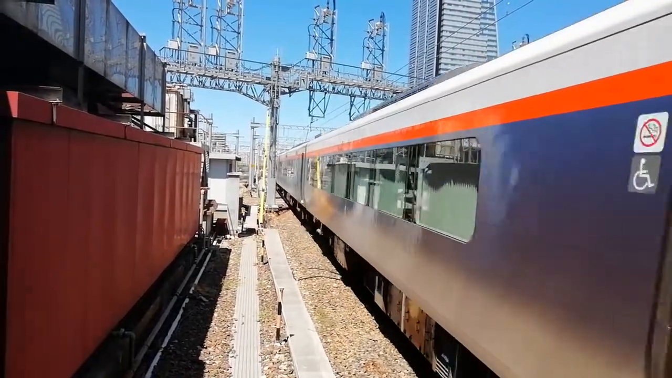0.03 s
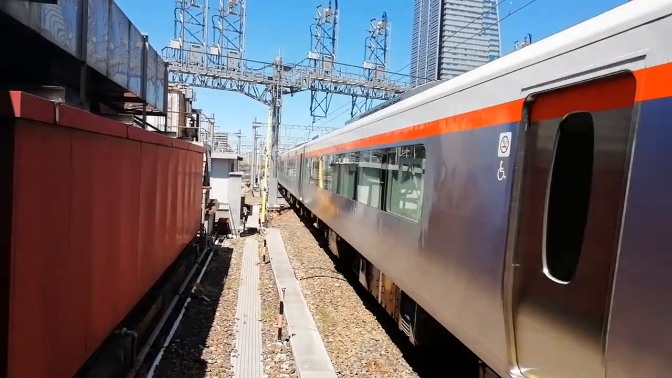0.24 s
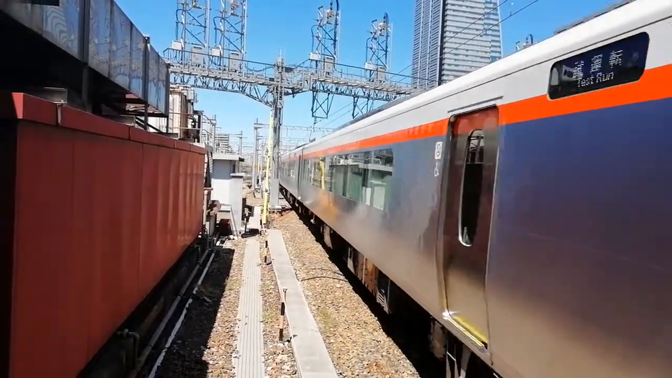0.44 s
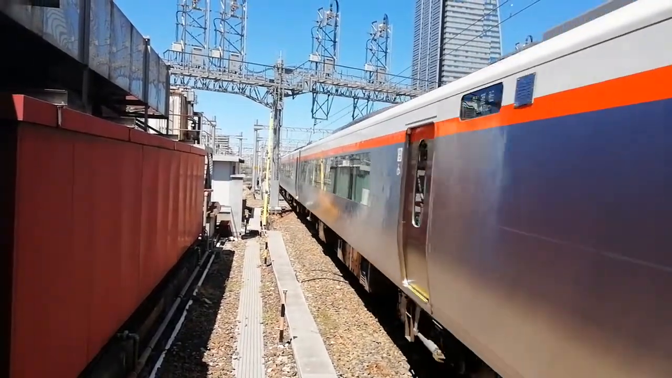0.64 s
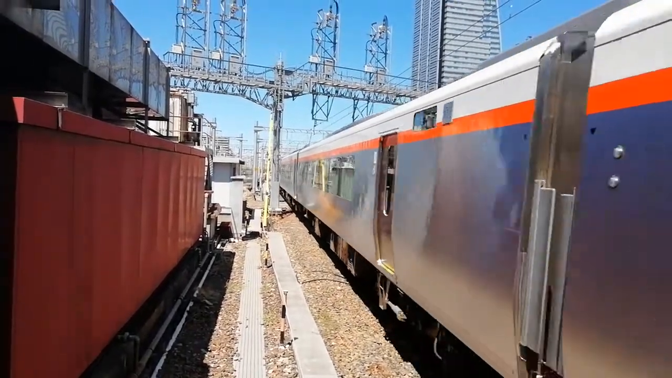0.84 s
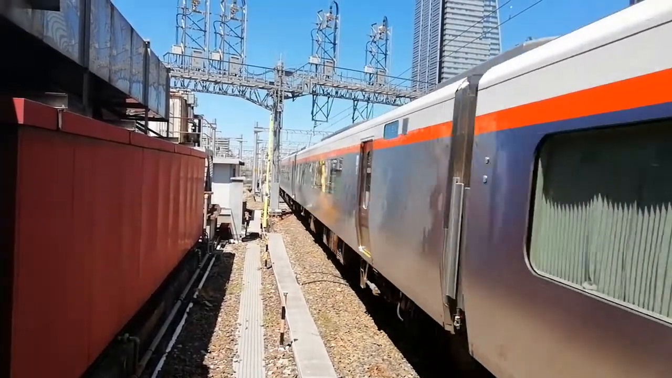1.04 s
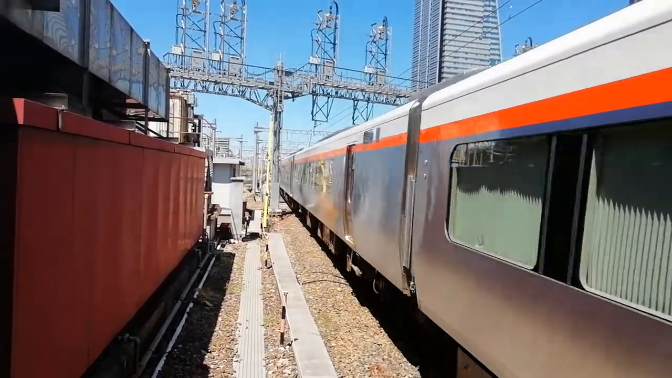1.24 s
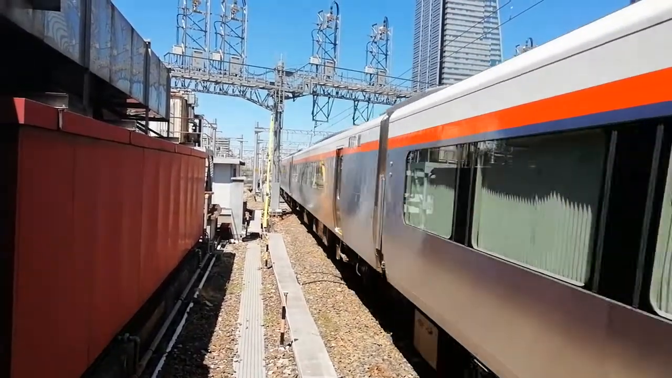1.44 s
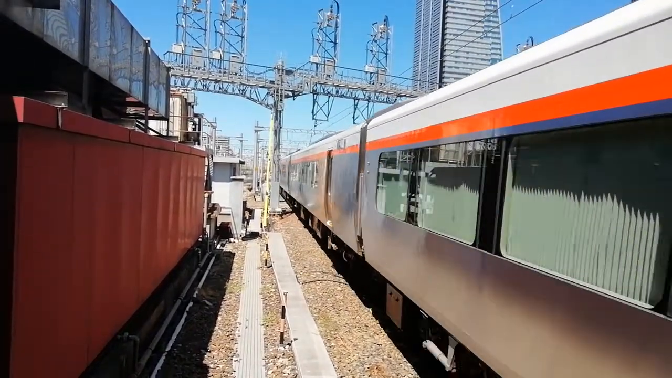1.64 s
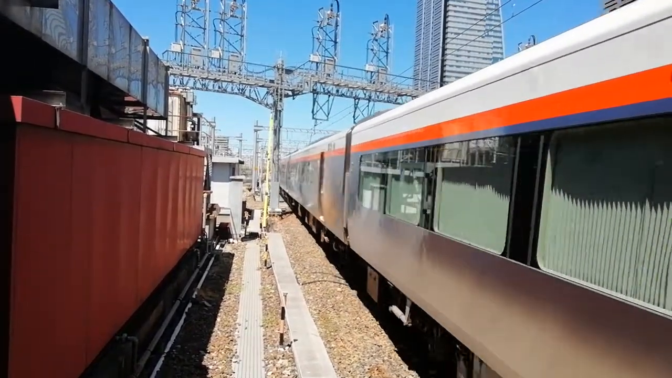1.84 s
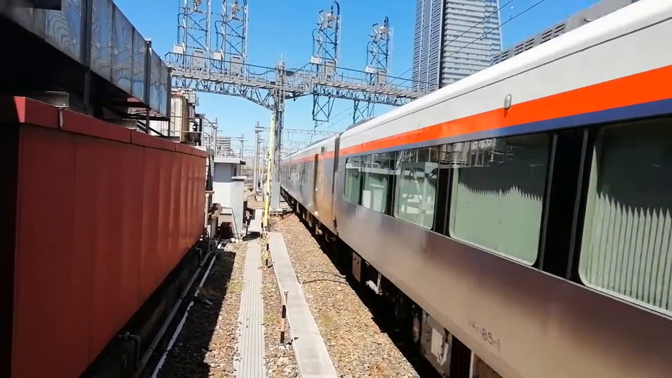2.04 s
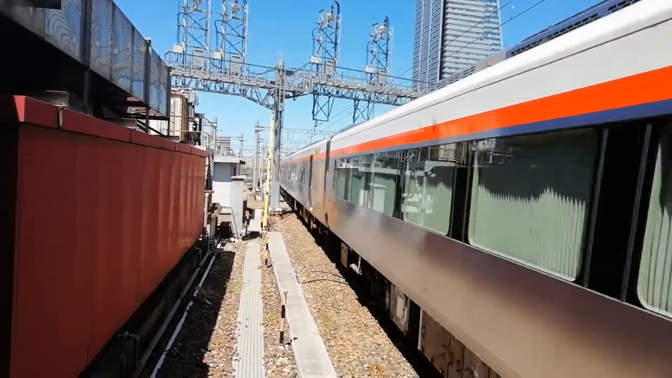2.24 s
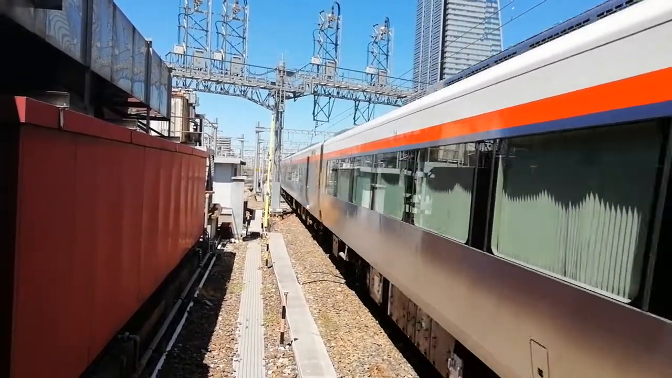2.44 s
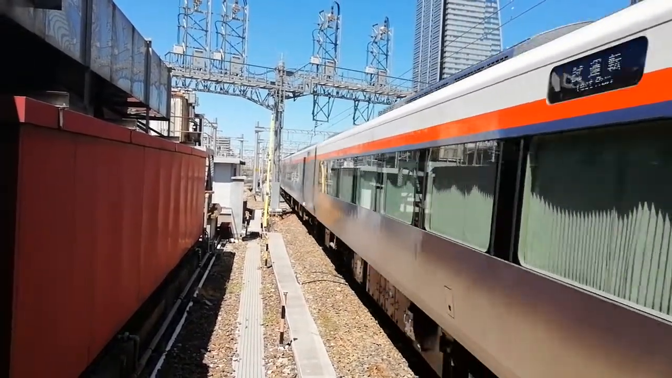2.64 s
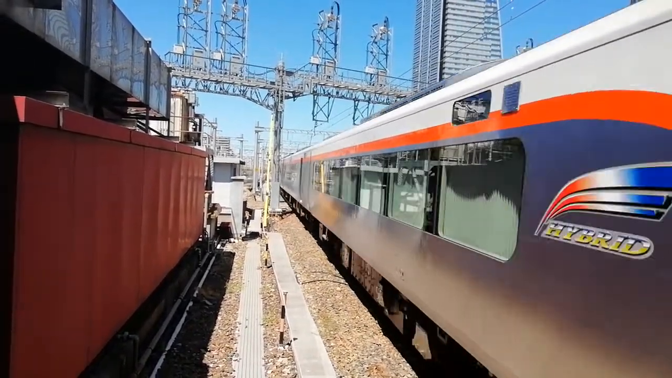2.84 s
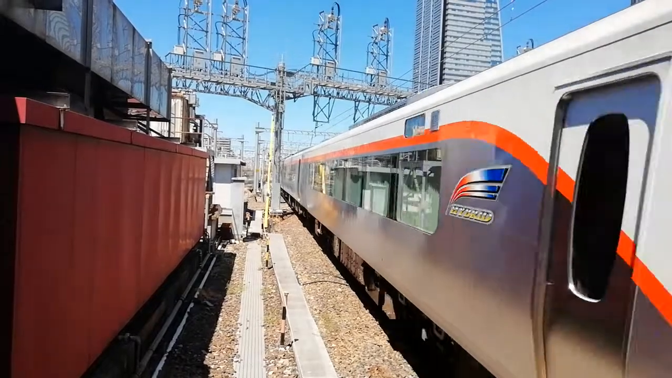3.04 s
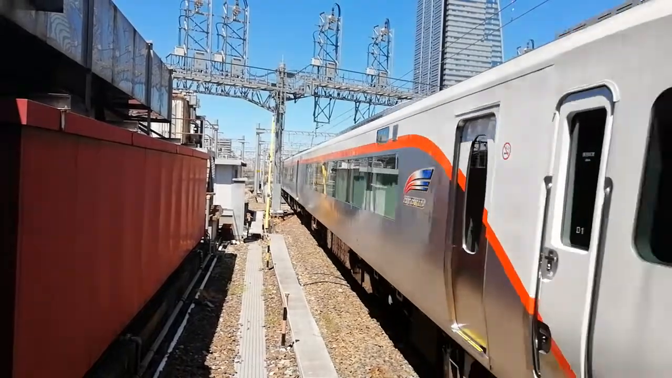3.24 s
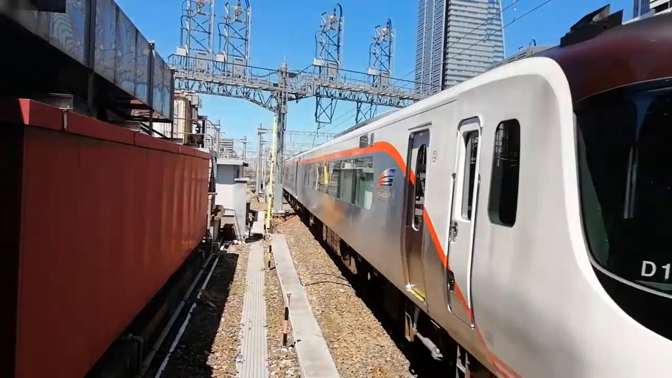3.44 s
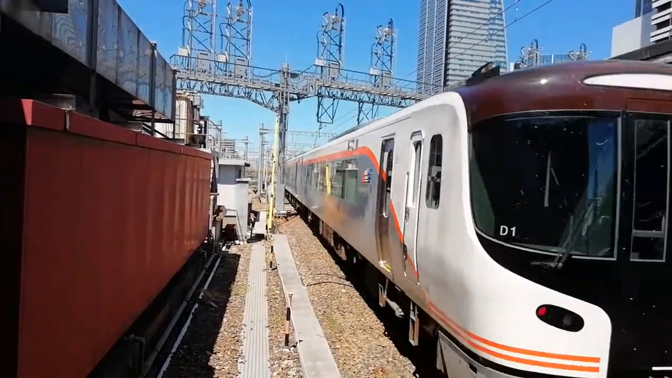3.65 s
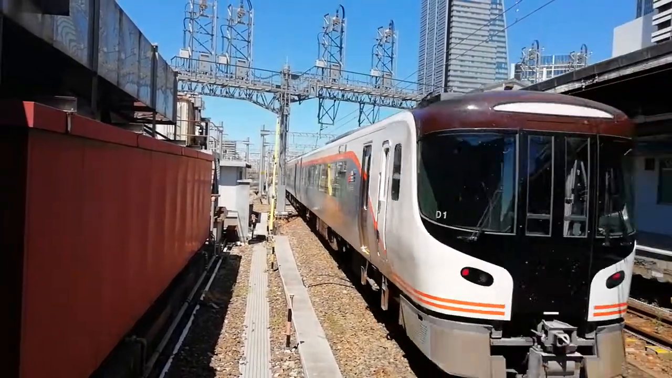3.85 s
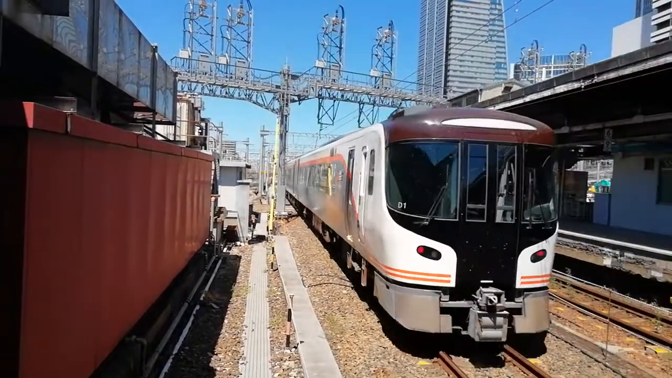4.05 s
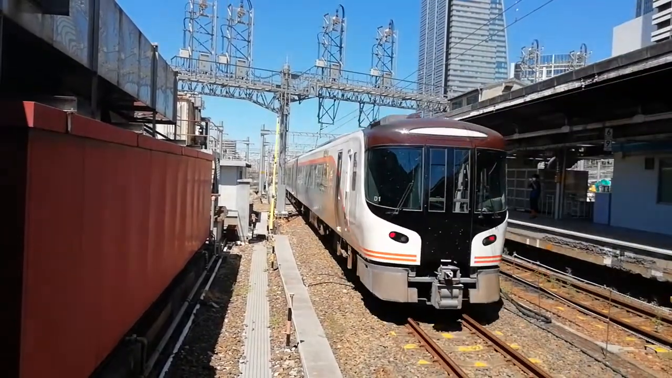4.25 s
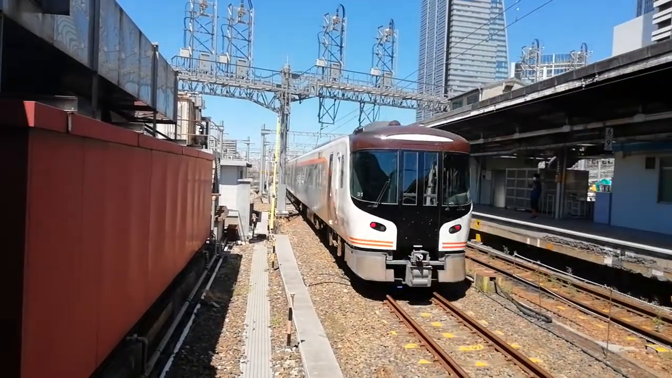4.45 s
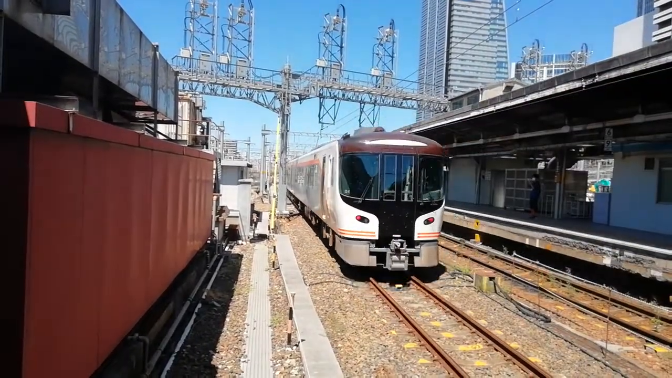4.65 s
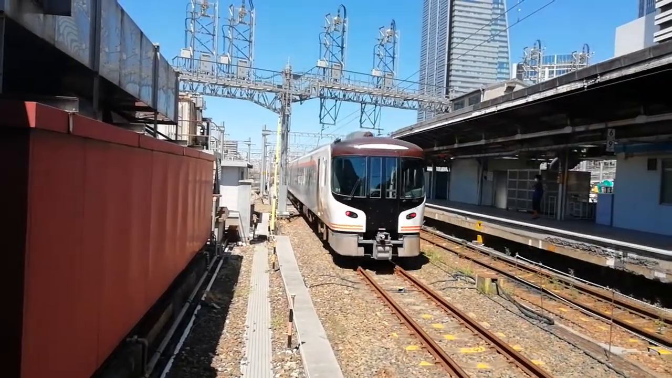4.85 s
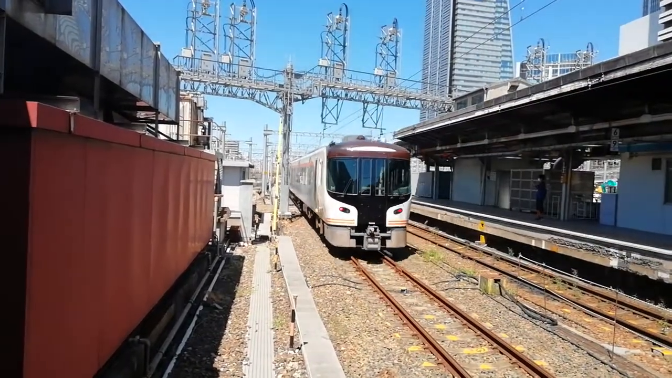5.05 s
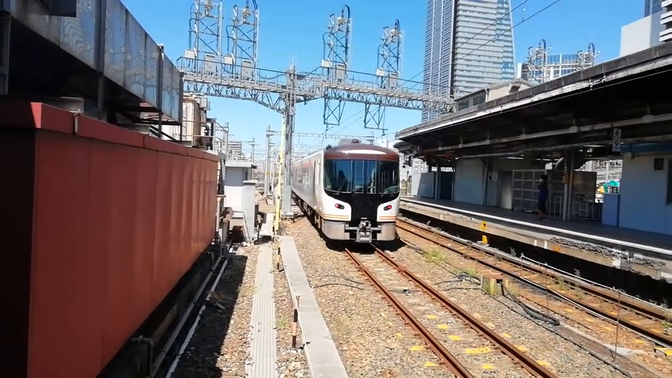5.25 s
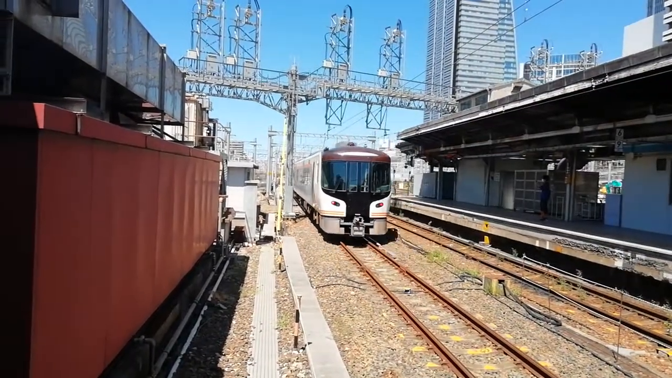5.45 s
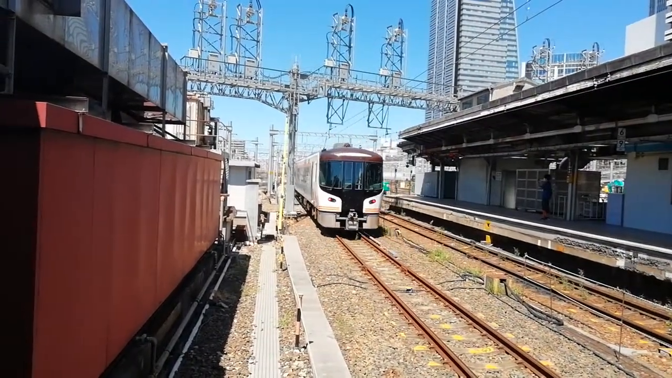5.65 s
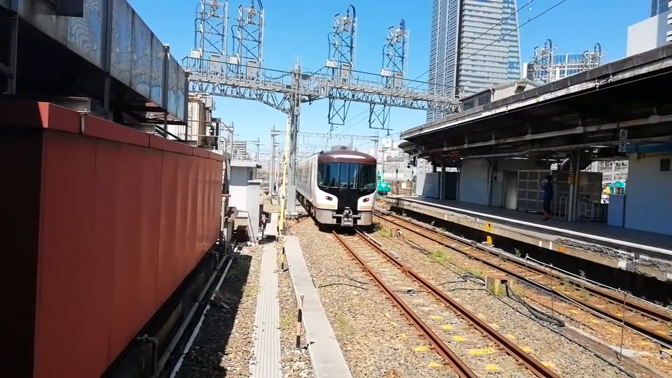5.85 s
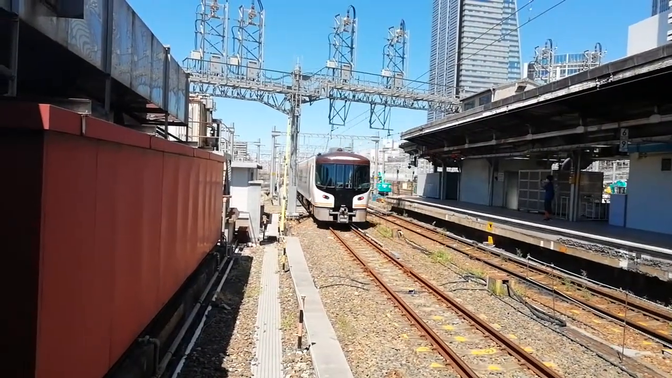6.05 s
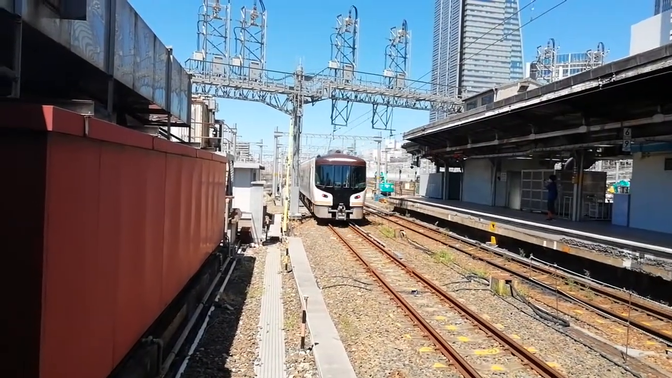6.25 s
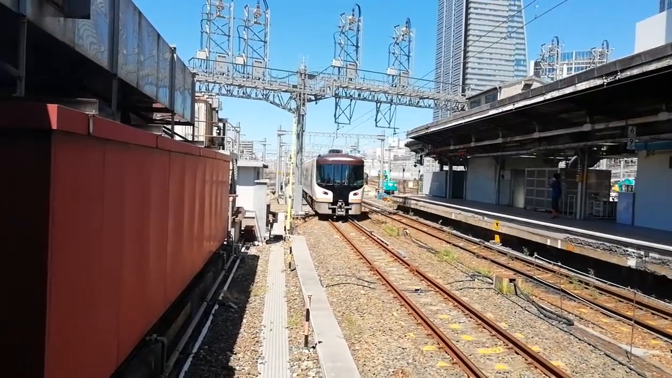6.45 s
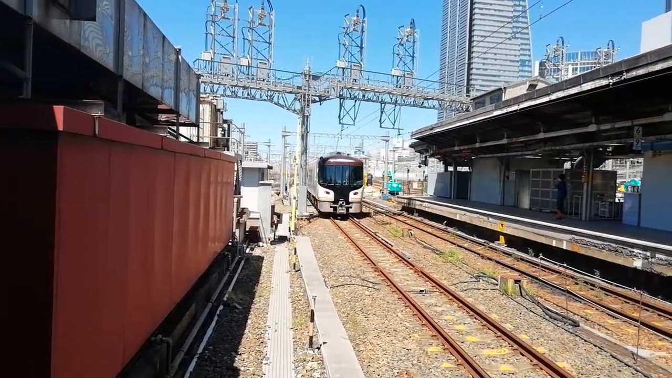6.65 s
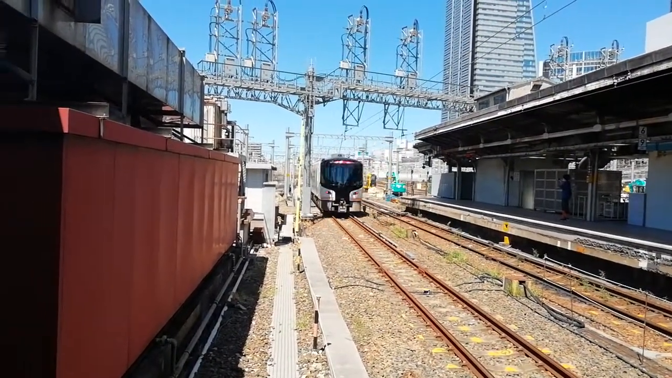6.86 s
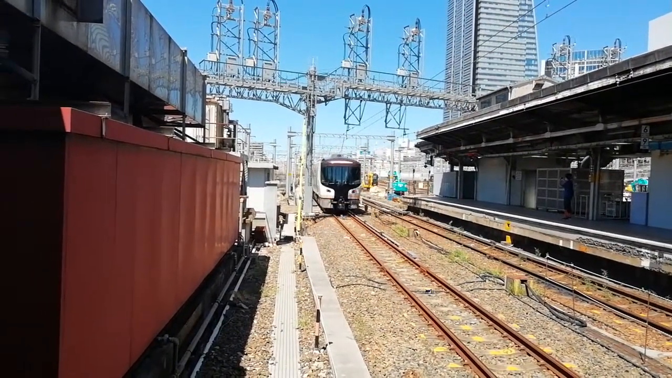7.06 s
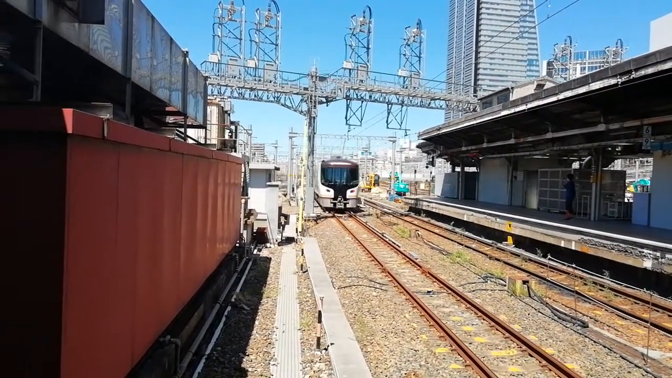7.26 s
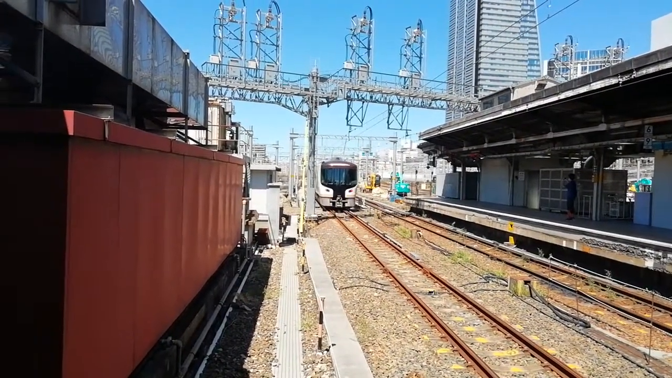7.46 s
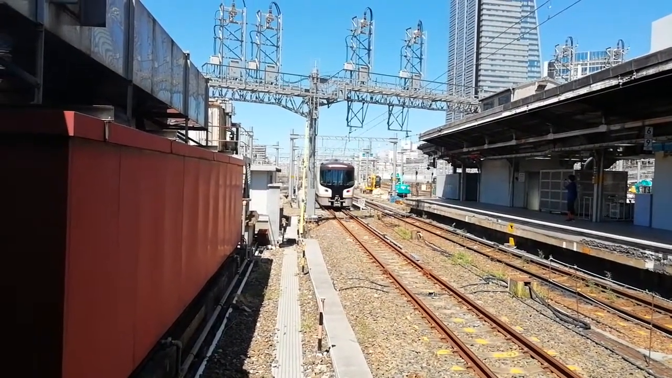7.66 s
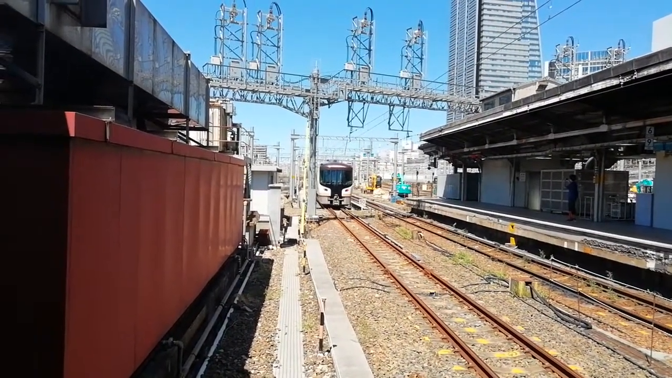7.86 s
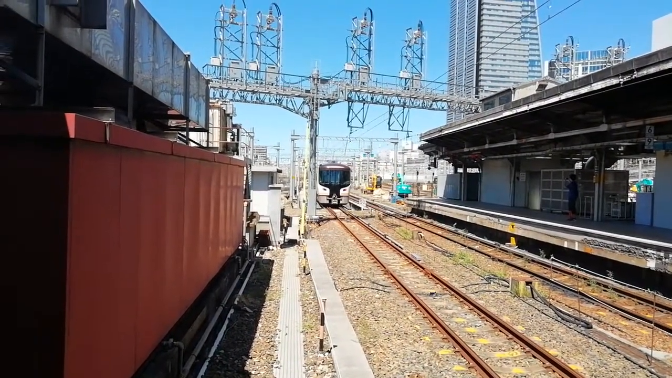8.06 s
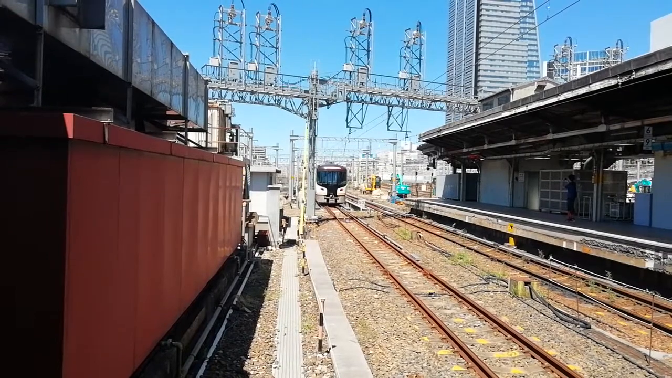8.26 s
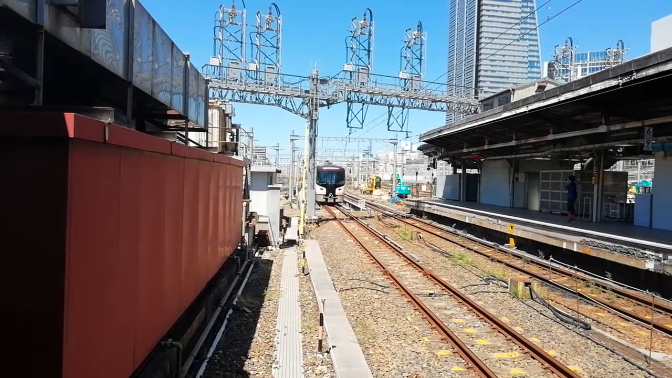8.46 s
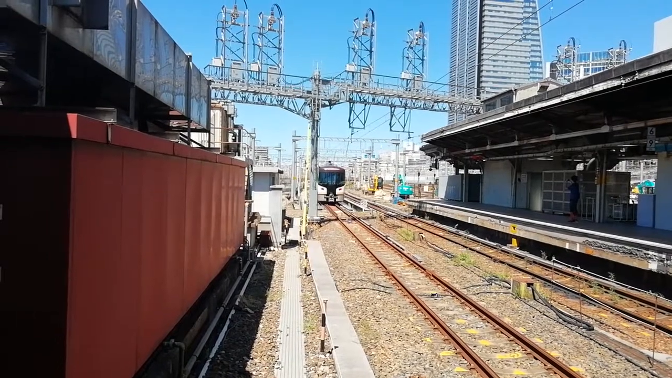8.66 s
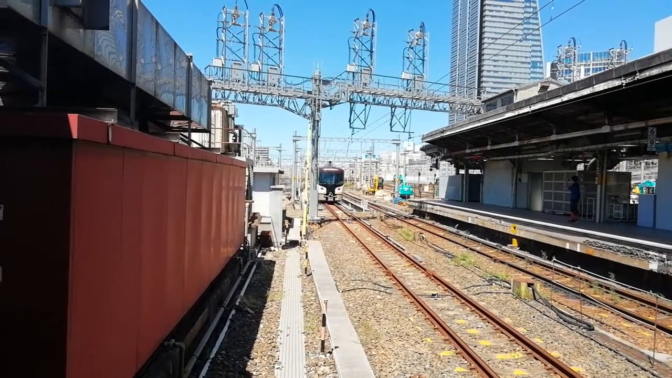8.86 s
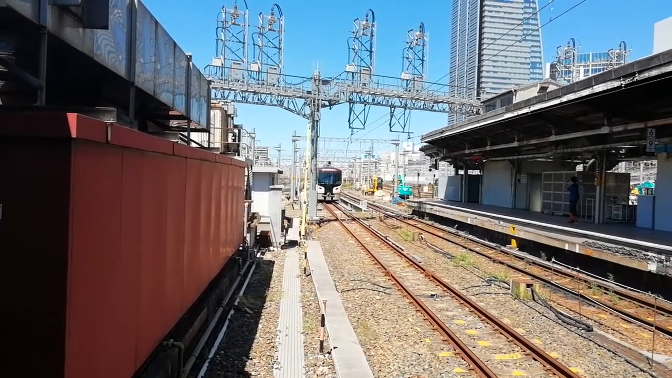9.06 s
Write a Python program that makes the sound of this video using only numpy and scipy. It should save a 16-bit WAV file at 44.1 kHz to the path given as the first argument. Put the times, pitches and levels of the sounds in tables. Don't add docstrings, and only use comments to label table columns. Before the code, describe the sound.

Outdoor stereo pickup from a fixed spot very near the rails. Car after car goes by with heavy diesel throb, metallic panel hum, rolling rumble and strong airy hiss from vents and grilles, with faint whistles inside it. The train then recedes, the hiss thinning first and the drone sinking unevenly, until soft clinks and a thin ringing rail appear far ahead, mostly to the right.

```python
import sys
import numpy as np
from scipy import signal
from scipy.fft import rfft, irfft, next_fast_len
from scipy.io import wavfile

SR = 44100
rng = np.random.default_rng(int(sys.argv[2]) if len(sys.argv) > 2 else 0)


def boost_factor(decibels):
    exponent = np.asarray(decibels, float) / 20
    return 10 ** exponent


def transcribe(u):
    v = np.clip(np.atleast_2d(u).T, -1, 1)
    q = np.round(v * 32767).astype(np.int16)
    wavfile.write(sys.argv[1], SR, q)


N = 401751
SIZE = next_fast_len(N)

# (time [s], firing rate [Hz], firing tone level [dB], its octave's level [dB])
EXHAUST = [(0.0, 82.3, -28, -34), (0.33, 81.76, -23, -30), (0.46, 81.37, -25, -41),
           (1.6, 80.84, -18.5, -26.5), (1.62, 81.2, -19.5, -34.5), (1.83, 80.7, -21, -21.5),
           (2.36, 81.4, -29.5, -32.5), (2.69, 81.77, -21.5, -18.5), (3.4, 80.3, -17, -23.5),
           (4.01, 79.7, -27.5, -36), (4.23, 81.25, -42.5, -40.5), (4.64, 78.4, -32.5, -48),
           (5.43, 78.74, -41, -61), (6.06, 78.85, -34.5, -35), (6.95, 78.6, -40, -51.5),
           (7.38, 79.15, -36.5, -42.5), (7.74, 78.66, -46, -50.5), (9.11, 81.8, -40.5, -51)]
# (time [s], half length [s], firing tone change [dB], octave change [dB])
BEATS = [(0.104, 0.029, 1.5, 6), (0.533, 0.057, 2.5, -14), (0.646, 0.04, 2.5, -2), (0.8, 0.055, 0.5, 5),
         (0.968, 0.055, 0.5, -3), (1.06, 0.038, -4, 2.5), (1.406, 0.069, -2, 5), (2.135, 0.029, 1.5, -4.5),
         (2.6, 0.058, -5.5, -1), (2.897, 0.058, -2, 1), (3.664, 0.073, 0, -5.5), (4.35, 0.034, 0, 7),
         (4.459, 0.025, 7.5, 11), (4.558, 0.034, -2, 3), (4.72, 0.054, 7.5, 4), (4.969, 0.11, -4.5, 8.5),
         (5.25, 0.04, 4, -1), (5.5, 0.041, 4, 12), (5.699, 0.1, 0.5, 2), (6.72, 0.065, 4, 5),
         (7.5, 0.04, -1, -0.5), (8.0, 0.064, -15, -1), (8.297, 0.15, 0, -1)]
# (multiple of the full engine cycle [1], front engine level [dB], tail engine level [dB])
LOW_ORDERS = [(4, -32, -31), (5, -38, -41), (7, -27, -29), (8, -14, -12.5), (9, -15.5, -14),
              (10, -19.5, -15.5), (11, -29, -25), (13, -18.5, -13), (14, -24.5, -22), (15, -21, -22),
              (16, -22, -25), (17, -26, -20), (18, -27.5, -16.5), (19, -36, -27), (20, -29.5, -22),
              (21, -30, -24), (22, -26, -21), (23, -39, -36), (24, -45, -51), (25, -30, -23)]
HIGH_ORDERS = [(26, -39, -30), (27, -28, -30), (28, -32, -36), (29, -30, -28.5), (30, -25, -22.5),
               (31, -22, -41), (32, -26.5, -27.5), (33, -20.5, -20.5), (34, -31, -45), (35, -35, -30),
               (36, -23, -27), (37, -26, -23), (38, -45, -42)]
# (time [s], half length [s], swell [dB])
EXHAUST_PASSES = [
    (0.15, 0.1, 3.0),
    (1.45, 0.59, 11.7),
    (2.75, 0.29, 6.9),
    (3.2, 0.38, 7.6),
    (4.75, 0.15, 1.7),
    (7.42, 0.05, 3),
    (8.35, 0.08, 3.0),
    (3.95, 0.12, 1.8),
]
# (pitch [Hz], level against the body hum [dB])
HUMS = [(194, -2.5), (285, -20)]
# (time [s], half length [s], swell [dB])
PANEL_PASSES = [(0.12, 0.12, -8), (0.5, 0.13, 10.5), (0.82, 0.035, 18.5), (1.05, 0.068, 14),
                (1.2, 0.054, 11), (1.39, 0.075, 5), (1.7, 0.098, 15), (2.15, 0.06, 6), (2.72, 0.08, 12),
                (3.3, 0.18, 13), (4.75, 0.093, 3), (4.95, 0.11, 7.5), (6.25, 0.12, 4.5), (6.6, 0.11, 8),
                (6.95, 0.12, 7), (7.55, 0.063, 9.0), (8.35, 0.049, 17), (8.62, 0.1, 8.5),
                (8.75, 0.061, 7.5), (8.97, 0.1, 10.5)]
TAIL_ENGINE_S, ORDERS_FADE_DB = 2.6, -5.5


def engine(high_db):
    firing_hz, tone_db, octave_db = in_time(EXHAUST)
    s, half_s, tone_beat_db, octave_beat_db = np.transpose(BEATS)
    tone_db = tone_db + per_sample(swells(s, half_s, tone_beat_db))
    octave_db = octave_db + per_sample(swells(s, half_s, octave_beat_db))
    low_db = level_of(EXHAUST_PASSES, near_db=-40.5, by_distance=1, by_pass=1.096, wander_db=1.3)
    hum_db = level_of(PANEL_PASSES, near_db=-47, by_distance=0.5, by_pass=1.0861, wander_db=-2)

    cycle = 2 * np.pi * np.cumsum(firing_hz) / SR / 6
    firing = boost_factor(tone_db) * np.sin(6 * cycle)
    octave = boost_factor(octave_db) * np.sin(12 * cycle + 1.1)
    out = np.sqrt(2) * (firing + octave)

    coarse = cycle[::10]
    size = len(coarse)
    uneven, far = np.zeros(size), farness()[::10]
    tail = np.clip((np.arange(0, N, 10) / SR - TAIL_ENGINE_S) / 0.31 + .5, 0, 1)
    for orders, level_db in ((LOW_ORDERS, low_db[::10] + 8.5), (HIGH_ORDERS, high_db[::10] + 19.5)):
        for order, front_db, tail_db in orders:
            db = level_db + front_db + (tail_db - front_db) * tail + ORDERS_FADE_DB * far
            db = db + (1.5 + 3.1 * far) * drift(1.0, size=size)
            wander = (0.15 + 0.8 * far) * drift(3.0, size=size) + rng.uniform(0, 2 * np.pi)
            uneven += boost_factor(db) * np.sin(order * coarse + wander)
    out += signal.resample_poly(uneven, 10, 1)[:N]
    for hz, db in HUMS:
        out += boost_factor(hum_db + db) * wavering(hz, wobble_hz=3.53, flutter_db=2.5)
    return out


# (time of the cut [s], build-up time [s], level [dB])
ECHO_CUTS = [
    (4.83, 0.07, 6.5),
    (7.45, 0.076, 4.5),
]


def echo_cuts():
    t = np.arange(N) / SR
    out = np.zeros(N)
    for s, build_s, db in ECHO_CUTS:
        growth = np.exp(np.minimum(t - s, 0) / build_s)
        out += db * growth * np.clip((s - t) / .006, 0, 1)
    return out


# (time [s], pitch [Hz], half length [s], peak level [dB])
CASING_RINGS = [(0.117, 412, 0.06, -42), (0.15, 245, 0.05, -41), (0.168, 285, 0.1, -41),
                (0.36, 410, 0.06, -40), (0.65, 285, 0.05, -44), (0.97, 480, 0.1, -46),
                (1.03, 288, 0.07, -42), (1.17, 412, 0.1, -36), (1.34, 420, 0.1, -47),
                (1.379, 480, 0.08, -42), (1.39, 194.4, 0.079, -30), (1.88, 293, 0.15, -43),
                (1.85, 415, 0.05, -48), (1.93, 445, 0.091, -37), (1.95, 474, 0.2, -41),
                (2.0, 600, 0.15, -49), (2.17, 481, 0.09, -38), (2.363, 421, 0.16, -32.5),
                (2.45, 245.5, 0.05, -37), (2.45, 442, 0.055, -37), (2.554, 505, 0.06, -39),
                (2.65, 483, 0.054, -39), (2.801, 420, 0.093, -38.5), (2.8, 505, 0.078, -37),
                (3.08, 490, 0.06, -37), (3.25, 475, 0.11, -45), (3.27, 440, 0.096, -33.5),
                (3.3, 404, 0.08, -42), (3.78, 481, 0.089, -42), (3.8, 243, 0.2, -48.5),
                (3.93, 284, 0.05, -44.5), (4.0, 454, 0.07, -39), (4.15, 283, 0.1, -41.5),
                (4.5, 430, 0.05, -48), (4.55, 478, 0.04, -37.5), (4.7, 410, 0.048, -47),
                (5.6, 421, 0.31, -57), (8.6, 404, 0.35, -55)]
RING_WOBBLE_HZ, RING_FLUTTER_DB = 7.0, 1.5


def casing_rings():
    t = np.arange(0, N, 10) / SR
    out = np.zeros(len(t))
    for s, hz, half_s, db in CASING_RINGS:
        turn = 2 * np.pi * np.cumsum(hz + RING_WOBBLE_HZ * drift(7.9, size=len(t))) * 10 / SR
        level = boost_factor(db + RING_FLUTTER_DB * drift(9.5, size=len(t)))
        out += level * np.exp(-.5 * ((t - s) / half_s) ** 2) * np.sin(turn)
    return np.sqrt(2) * signal.resample_poly(out, 10, 1)[:N]


# (time [s], half length [s], swell [dB])
ENGINE_PASSES = [
    (0.2, 0.2, 1.5),
    (1.14, 0.13, 4),
    (1.802, 0.32, 2.5),
    (2.404, 0.23, 10.5),
    (2.836, 0.07, 4.5),
    (3.262, 0.13, 8),
    (3.949, 0.15, 2.5),
    (4.6, 0.14, 0),
]


def casing_level():
    return level_of(ENGINE_PASSES, near_db=-42, by_distance=0.84, by_pass=0.96, wander_db=0)


# (time [s], half length [s], swell [dB])
AXLE_PASSES = [(0.75, 0.18, 2), (1.8, 0.28, 5.5), (2.5, 0.2, 3), (2.95, 0.12, 3.5), (4.0, 0.19, -3.5),
               (5.1, 0.18, -1), (5.5, 0.17, -0.5), (6.3, 0.1, -4.5), (7.4, 0.1, 2), (8.05, 0.1, 2.5),
               (8.3, 0.12, 2), (8.6, 0.1, 1.5), (9.0, 0.15, 1)]
# (time [s], half length [s], swell [dB])
MOTOR_PASSES = [
    (0.798, 0.083, 2.7),
    (1.35, 0.14, 7.1),
    (1.85, 0.22, 9.3),
    (2.3, 0.26, 12),
    (2.6, 0.058, 5.7),
    (3.0, 0.19, 5.3),
    (4.6, 0.15, 2.2),
    (8.2, 0.58, 2.52),
]
# (time [s], half length [s], swell [dB])
BOGIE_PASSES = [
    (0.7, 0.08, 0),
    (1.4, 0.76, 1),
    (2.1, 0.3, 0.5),
    (2.45, 0.08, 0.5),
    (3.45, 0.47, -1.5),
    (4.6, 0.51, 1),
    (8.2, 0.36, 1),
]


def running_gear(fields, casing_db):
    rumble_db = level_of(AXLE_PASSES, near_db=-40.5, by_distance=0.6, by_pass=1.06, wander_db=1)
    drone_db = level_of(MOTOR_PASSES, near_db=-53, by_distance=0.3, by_pass=1.06, wander_db=0.5)
    roll_db = level_of(BOGIE_PASSES, near_db=-43.5, by_distance=0.47, by_pass=0.57, wander_db=0.8)
    hiss_db = level_of(BOGIE_PASSES, near_db=-43.5, by_distance=0.58, by_pass=1.07, wander_db=0.4)
    ahead, far = aheadness(), farness()
    gear = boost_factor(rumble_db + 3.0 + 1.3 * far) * band_of(fields, 66, 335, ahead)
    gear += boost_factor(casing_db - 4.5 + 3.6 * far) * band_of(fields, 335, 510, ahead)
    gear += boost_factor(drone_db - 3.0) * band_of(fields, 510, 660, ahead)
    gear += boost_factor(roll_db) * band_of(fields, 660, 1230, ahead)
    gear += boost_factor(hiss_db + 2.0) * band_of(fields, 1230, 2330, ahead)
    return gear


# (time [s], half length [s], swell [dB])
FAN_PASSES = [
    (0.4, 0.4, 0.56),
    (2.55, 0.18, 1.4),
    (3.45, 0.42, -2.1),
    (4.3, 0.96, 0.84),
    (7.55, 0.1, -0.3),
]


def rush_level():
    return level_of(FAN_PASSES, near_db=-35, by_distance=0.91, by_pass=1.23, wander_db=0.2)


# (time [s], half length [s], swell [dB])
VENT_PASSES = [
    (0.0, 0.16, 4.5),
    (0.6, 0.46, 6.5),
    (0.76, 0.05, 0.5),
    (2.64, 0.092, 2),
    (2.8, 0.48, 0),
    (3.5, 0.25, -2.5),
    (4.2, 0.2, 1),
]
# (time [s], half length [s], swell [dB])
LOUVRE_PASSES = [
    (0.0, 0.1, 1.5),
    (0.4, 0.58, 4.5),
    (1.8, 0.15, 0),
    (2.62, 0.088, 2.5),
    (2.8, 0.44, 3.5),
    (4.0, 0.3, 1.5),
]
# (time [s], left-right difference [dB])
TOP_PAN = [(0, 7), (0.9, 5), (1.5, -2.5), (2.2, -2.5), (2.7, 1), (4.5, 4), (9.11, -5)]
AIR_PAN_DB, PAN_PER_VENT_DB, RUSH_GUST_DB = -0.5, 0.2, 0.4


def cooling_air(fields, rush_db):
    jet_db = level_of(VENT_PASSES, near_db=-32, by_distance=1.266, by_pass=1.1, wander_db=0.5)
    top_db = level_of(LOUVRE_PASSES, near_db=-52, by_distance=1.2, by_pass=2, wander_db=0.5)
    gust, far = drift(24), farness()
    jet_db = jet_db + 0.13 * gust + 0.58 * drift(64) + 0.24 * drift(26)
    air = boost_factor(rush_db + RUSH_GUST_DB * gust) * band_of(fields, 2330, 5650, far)
    air += boost_factor(jet_db) * band_of(fields, 5650, 12250, far)
    pan_db = AIR_PAN_DB + PAN_PER_VENT_DB * per_sample(swells(*np.transpose(VENT_PASSES)))
    air *= boost_factor(np.array([pan_db, -pan_db]) / 2)
    top_pan_db = np.array([[.5], [-.5]]) * in_time(TOP_PAN)[0]
    air += boost_factor(top_db + .2 * gust + top_pan_db) * band_of(fields, 12250, 17000, far)
    return air


# (pitch [Hz], width [Hz], level re rush alongside [dB], level re rush far off [dB], left-right difference [dB])
WHISTLES = [(4100, 20, -31, -27, -5), (1033, 60, -16, -13.5, -1), (1385, 22, -23, -15, -11),
            (594.6, 22, -17.5, -21, 1)]
# (time [s], converter whine [Hz], wheel ring [Hz], wheel ring level [dB])
RINGS = [(0, 2333, 1400, -56), (1.1, 2440, 1437, -63), (1.75, 2418, 1687, -46), (2.0, 2420, 1527, -40),
         (2.15, 2433, 1560, -49), (2.38, 2426, 1630, -40), (2.6, 2410, 1400, -46),
         (2.95, 2400, 1335, -45.5), (3.3, 2400, 1356, -52), (4.2, 2347, 1416, -50), (6, 2380, 1400, -58.5),
         (9.11, 2390, 1385, -53.5)]
# (time [s], half length [s], swell [dB])
CONVERTER_PASSES = [(0.7, 0.27, 2.7), (1.84, 0.055, 8.7), (2.0, 0.087, 5.0), (2.17, 0.057, 7.3),
                    (2.28, 0.05, 5), (2.4, 0.081, 7.3), (2.65, 0.09, 3.6), (3.05, 0.06, 2.8),
                    (3.9, 0.19, 1.8), (5.05, 0.31, 5.6), (6.2, 0.2, 3.0), (8.4, 0.15, 7.1)]
# (time [s], centre [Hz])
GRILLE_HZ = [(0, 3800), (1, 3855), (2.2, 3674), (2.8, 3542), (5, 3588), (9.11, 3585)]
# (time [s], half length [s], swell [dB])
GRILLE_PASSES = [
    (0.4, 0.3, 8.2),
    (1.3, 0.2, 3),
    (2.35, 0.1, 2.3),
    (2.7, 0.17, 6.7),
    (4.3, 0.79, 4),
    (5.8, 0.5, 3),
]
WHINE_WIDTH_HZ, WHEEL_WIDTH_HZ, GRILLE_WIDTH_HZ = 65, 260, 440


def whistles(rush_db):
    far = farness()
    whine_hz, wheel_hz, wheel_db = in_time(RINGS)
    whine_db = level_of(CONVERTER_PASSES, near_db=-47.5, by_distance=0.75, by_pass=1.0, wander_db=1.5)
    grille_db = level_of(GRILLE_PASSES, near_db=-51, by_distance=1, by_pass=1.0, wander_db=-0.5)
    tones = []
    for hz, width_hz, near_db, far_db, pan_db in WHISTLES:
        level_db = rush_db + near_db + (far_db - near_db) * far + 1.9 * drift(0.91)
        tones.append((hz, width_hz, level_db, pan_db))
    tones.append((whine_hz, WHINE_WIDTH_HZ, whine_db + 0.5 - 7.7 * far, -4.5))
    tones.append((wheel_hz, WHEEL_WIDTH_HZ, wheel_db, -6))
    tones.append((in_time(GRILLE_HZ)[0], GRILLE_WIDTH_HZ, grille_db, -10))
    out = np.zeros((2, N))
    for hz, width_hz, level_db, pan_db in tones:
        shared, own = narrow_noise(hz, width_hz, channels=2)
        left = boost_factor(pan_db / 2) * shared
        right = boost_factor(-pan_db / 2) * (1.4 * own - .5 * shared)
        out += boost_factor(level_db) * np.array([left, right])
    return out


# (time [s], level [dB])
RAIL_SONG = [(5.9, -75), (6.45, -57), (6.75, -58), (7.1, -68), (7.57, -67), (7.66, -54), (7.9, -55),
             (8.0, -57), (8.1, -52), (8.2, -54), (8.27, -61), (8.37, -50), (8.43, -57), (8.56, -57),
             (8.66, -67)]
# (time [s], peak level [dB], pitch [Hz])
CLINKS = [
    (7.631, -34.5, 3850),
    (7.645, -44, 2300),
    (7.845, -46, 4000),
    (8.09, -44, 3100),
    (8.235, -45, 4100),
    (8.335, -44, 2900),
    (9.094, -43, 3450),
]
RAIL_HZ = 3222


def rails():
    song_db, = in_time(RAIL_SONG)
    out = boost_factor(song_db) * wavering(RAIL_HZ, wobble_hz=1.0, flutter_db=.8)
    age = np.arange(SR // 5) / SR
    for s, db, hz in CLINKS:
        noise = rng.standard_normal(len(age))
        ring = rms_one(resonate(resonate(noise, hz, 1800), hz, 1800))
        burst = ring * (1 - np.exp(-age / .009)) * np.exp(-age / .03)
        start = round(s * SR)
        out[start:start + len(age)] += boost_factor(db) * burst[:N - start]
    return out * boost_factor(np.array([[-9.], [5.5]]))


# (time [s], half length [s], swell [dB])
GROUND_THUDS = [
    (2.2, 0.3, -6),
    (2.8, 0.2, 4),
    (3.8, 0.18, 6),
    (4.74, 0.11, 8),
    (6.1, 0.3, 0),
    (7.4, 0.3, 8),
    (8.2, 0.4, 0),
]


def ground(fields):
    level_db = level_of(GROUND_THUDS, near_db=-46, by_distance=0.5, by_pass=0.5, wander_db=-0.2)
    return boost_factor(level_db) * band_of(fields, 21, 66, aheadness())


# (frequency [Hz], left level [dB], right level [dB])
COLOUR_NEAR = [(25, -6, -6), (45, -3, -5), (64.5, 5, 4), (141, 10, -0.5), (220, 3, 1), (283, 2, 3.5),
               (363, -7, -2), (433, 11.5, 13.5), (498, 7.5, 10), (576, -4, 3.5), (673, -3.5, -0.5),
               (742, -1.5, 1.5), (1110, -3.5, -6.5), (1400, -8, -7), (1900, -7, -5),
               (2360, -12, -9), (2620, -9, -7), (2700, -10.5, -4), (3940, -10.5, -6), (5720, -15.5, -7.5),
               (6360, -12.5, 1.5), (7280, -16, 2.5), (7900, -5, 7.5), (8660, -16, 3.5), (9250, -3, 1.6),
               (9820, -5.5, -1), (11000, -4.5, -15), (11500, -4.5, -24), (12000, -9, -20),
               (12300, -14, -18), (14100, -21, -25), (15700, -26, -35)]
COLOUR_FAR = [(25, -9, -9), (45, -7, -7), (65, 0, -2), (139, -1.5, -1.5), (194, -1, 0.5), (297, -5, -6),
              (330, -9.5, -6), (406, 3, 2.5), (500, -10, -4.5), (566, -8, -7), (665, -9.5, -12.5),
              (860, -3.5, -12), (1010, -12.5, -5), (1400, -9.5, -21.5), (1960, -14, -9.5),
              (2260, -17, -18), (2400, -19.5, -15), (2830, -16.5, -11.5), (4320, -19.5, -11),
              (5400, -28, -16.5), (7640, -27, -11.5), (7860, -29, -8.5), (9400, -23.5, -17.5),
              (10140, -24.5, -22.5), (11200, -20.5, -36), (12600, -33, -35), (14100, -36, -40),
              (15600, -44, -44)]
# (frequency [Hz], right port's lead [rad], likeness [0-1])
PORTS_NEAR = [(40, 0, .98), (130, .1, .96), (240, .4, .9), (360, 1.1, .6), (450, 2, .8), (600, 2.7, .65),
              (750, 2.9, .45), (900, 1.8, .3), (1100, .5, .2), (1300, 0, .2), (2200, 0, 0)]
PORTS_FAR = [(40, 0, .99), (130, -.1, .97), (280, -.1, .86), (400, -.7, .6), (460, -1.5, .25),
             (540, -2.7, .6), (670, -3.1, .5), (760, -3.1, .3), (850, -.4, .3), (1030, -1, .55),
             (1300, -.6, .3), (2200, 0, 0)]


def noise_fields():
    near = port_noise(COLOUR_NEAR, PORTS_NEAR)
    far = port_noise(COLOUR_FAR, PORTS_FAR)
    return near, far


def port_noise(colour, ports):
    left_db, right_db = in_pitch(colour)
    lead, alike = in_pitch(ports)
    shared, own = rfft(rng.standard_normal((2, SIZE)))
    right = alike * np.exp(1j * lead) * shared + np.sqrt(1 - alike ** 2) * own
    return np.array([boost_factor(left_db) * shared, boost_factor(right_db) * right])


def band_of(fields, low_hz, high_hz, ahead):
    octaves = np.log2(np.fft.rfftfreq(SIZE, 1 / SR) + 1)
    above_low = np.clip((octaves - np.log2(low_hz)) * 4 + .5, 0, 1)
    above_high = np.clip((octaves - np.log2(high_hz)) * 4 + .5, 0, 1)
    mask = np.sqrt(above_low * (1 - above_high))
    near, far = [rms_one(irfft(f * mask, SIZE)[:, :N]) for f in fields]
    return np.sqrt(1 - ahead) * near + np.sqrt(ahead) * far


# (frequency [Hz], left-right difference [dB])
PORT_TILT = [(250, 0), (400, -3.5), (520, -2.5), (700, -4)]


def at_ports(x):
    spectrum, ahead = rfft(x, SIZE), aheadness()
    tilt = boost_factor(in_pitch(PORT_TILT)[0] / 2)
    side_lead, ahead_lead = in_pitch(PORTS_NEAR)[0], in_pitch(PORTS_FAR)[0]
    left_near = irfft(spectrum * tilt, SIZE)[:N]
    right_near = irfft(spectrum / tilt * np.exp(1j * side_lead), SIZE)[:N]
    right_far = irfft(spectrum * np.exp(1j * ahead_lead), SIZE)[:N]
    return (1 - ahead) * np.array([left_near, right_near]) + ahead * np.array([x, right_far])


TAIL_PASSES_S, TAIL_SPREAD_S = 3.68, 0.58


def farness():
    t = np.arange(0, N, 100) / SR
    return per_sample(.5 + .5 * np.tanh((t - TAIL_PASSES_S) / TAIL_SPREAD_S))


AHEAD_SHARE, AHEAD_S = 0.52, 0.92


def aheadness():
    t = np.arange(N) / SR
    return np.clip(farness() + AHEAD_SHARE * np.exp(-(t / AHEAD_S) ** 2), 0, 1)


LEAVES_S, GAPS_PER_S = 2.844, 0.75


def level_of(passes, near_db, by_distance, by_pass, wander_db):
    t = np.arange(0, N, 100) / SR
    loss_db = 10 * np.log10(1 + (GAPS_PER_S * np.maximum(t - LEAVES_S, 0)) ** 2)
    db = near_db - by_distance * loss_db + by_pass * swells(*np.transpose(passes))
    return per_sample(db + wander_db * drift(3.1, size=len(t)))


def swells(s, half_s, db):
    t = np.arange(0, N, 100) / SR
    return np.asarray(db) @ np.exp(-.5 * ((t - np.c_[s]) / np.c_[half_s]) ** 2)


def per_sample(curve):
    return np.interp(np.arange(N), np.arange(len(curve)) * 100, curve)


def in_time(rows):
    s, *columns = np.transpose(rows)
    return [np.interp(np.arange(N) / SR, s, c) for c in columns]


def in_pitch(rows):
    hz, *columns = np.transpose(rows)
    grid = np.log(np.fft.rfftfreq(SIZE, 1 / SR) + 1)
    return [np.interp(grid, np.log(hz), c) for c in columns]


def narrow_noise(hz, width_hz, channels=1):
    lowpass = signal.butter(2, width_hz / 2, fs=SR, output="sos")
    slow = signal.sosfilt(lowpass, rng.standard_normal((2, channels, N)))
    turn = 2 * np.pi * np.cumsum(hz + np.zeros(N)) / SR
    x = slow[0] * np.cos(turn) + slow[1] * np.sin(turn)
    return x / x.std(axis=1, keepdims=True)


def wavering(hz, wobble_hz, flutter_db):
    turn = 2 * np.pi * np.cumsum(hz + wobble_hz * drift(5.1)) / SR
    return np.sqrt(2) * boost_factor(flutter_db * drift(13.0)) * np.sin(turn)


def resonate(x, hz, width_hz):
    r = np.exp(-np.pi * width_hz / SR)
    top = np.array([1, 0, -1]) * (1 - r * r) / 2
    return signal.lfilter(top, [1, -2 * r * np.cos(2 * np.pi * hz / SR), r * r], x)


def drift(rate, size=N):
    r = np.exp(-80 * np.pi * rate / SR)
    slow = signal.lfilter([1], [1, -2 * r, r * r], rng.standard_normal(N // 40 + 2002))[2000:]
    return np.interp(np.arange(size) * N / size / 40, np.arange(len(slow)), rms_one(slow))


def rms_one(x):
    return x / np.sqrt(np.mean(np.atleast_2d(x).mean(axis=0) ** 2) + 1e-20)


def scene():
    casing_db, rush_db, fields = casing_level(), rush_level(), noise_fields()
    out = at_ports(boost_factor(echo_cuts()) * engine(casing_db) + casing_rings())
    out = out + running_gear(fields, casing_db)
    out += cooling_air(fields, rush_db)
    out += whistles(rush_db)
    out += rails()
    out += ground(fields)
    return out


def top_cut(x):
    return signal.sosfilt(signal.butter(12, 15740, fs=SR, output="sos"), x)


def record(dry):
    return top_cut(dry)


dry = scene()
out = record(dry)
transcribe(out)
```